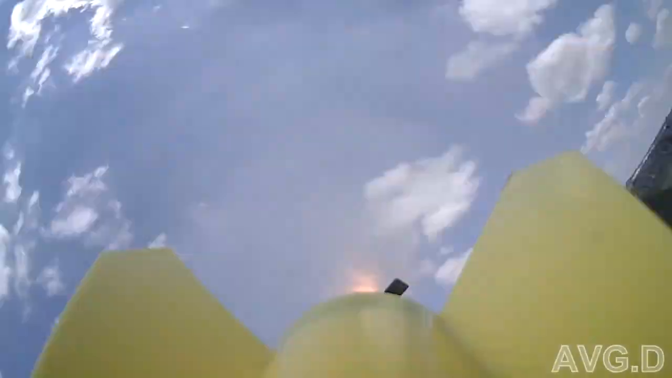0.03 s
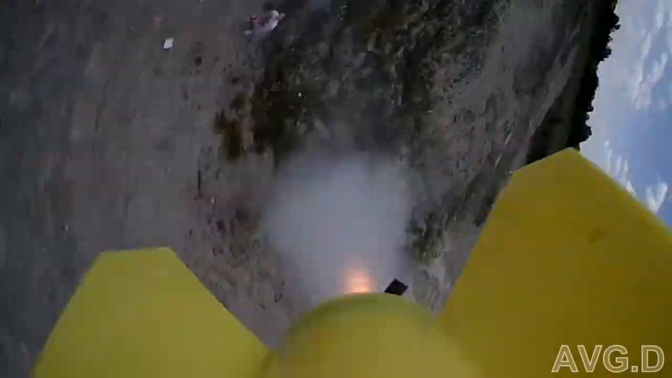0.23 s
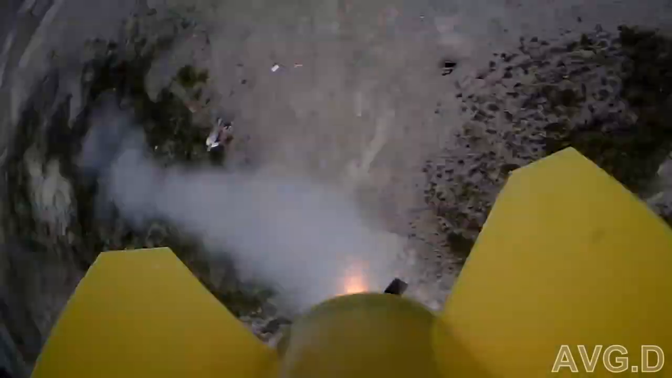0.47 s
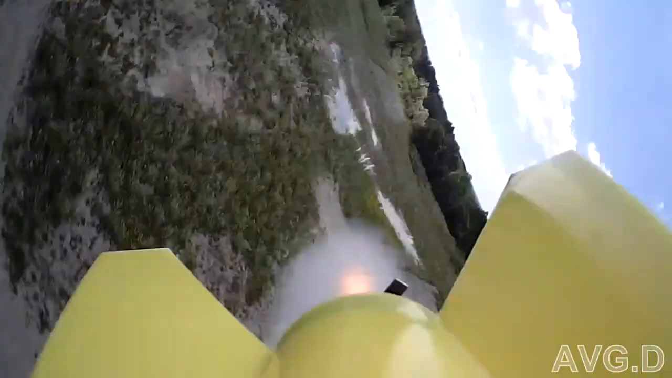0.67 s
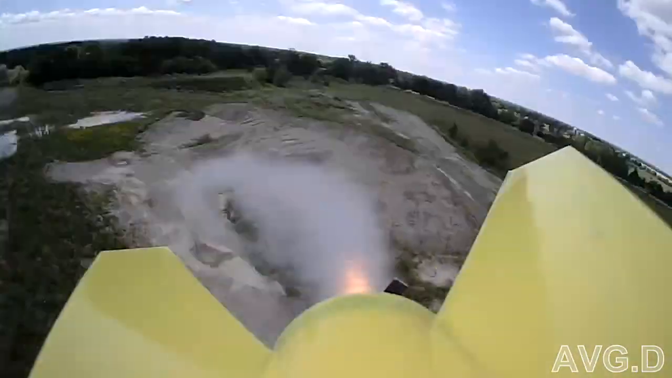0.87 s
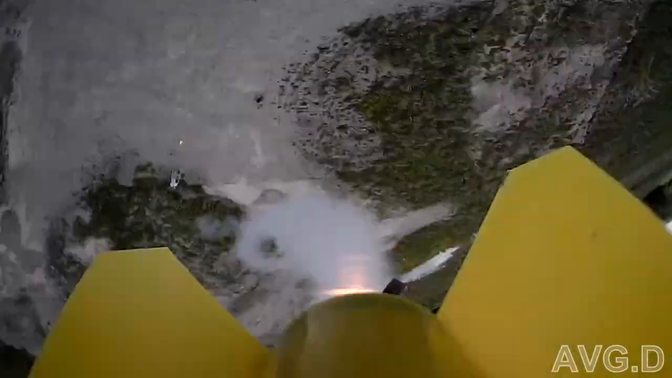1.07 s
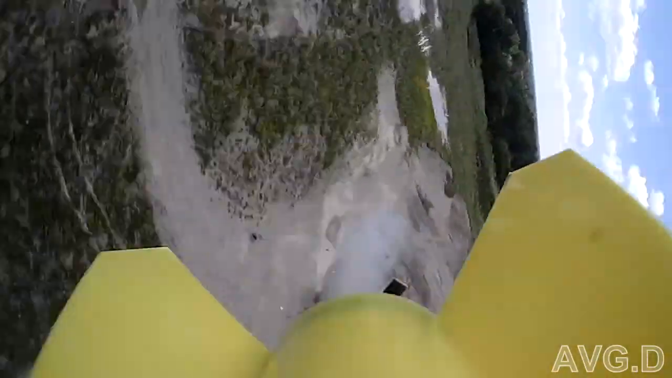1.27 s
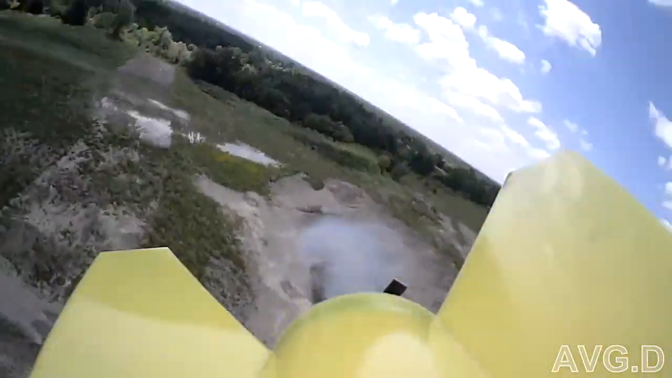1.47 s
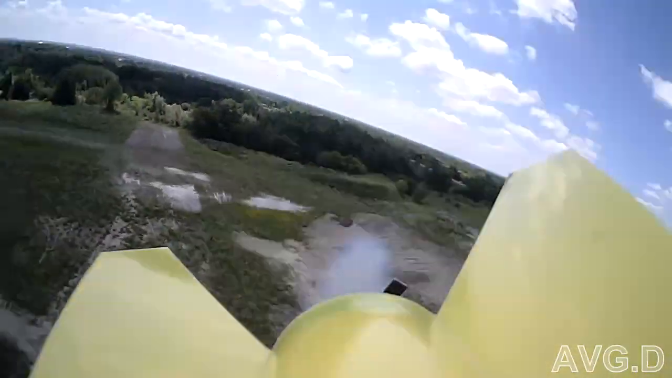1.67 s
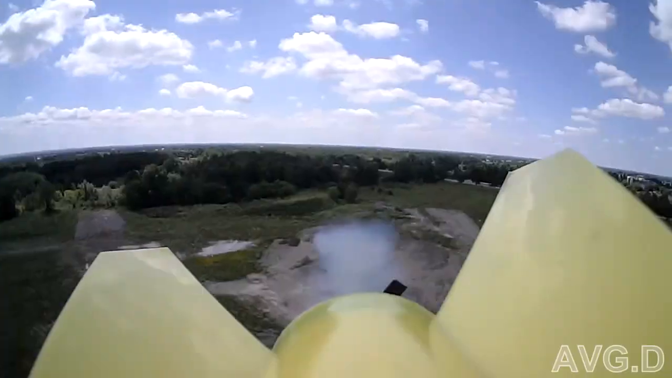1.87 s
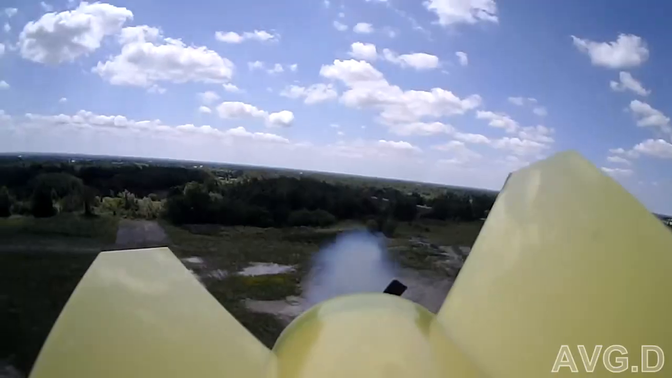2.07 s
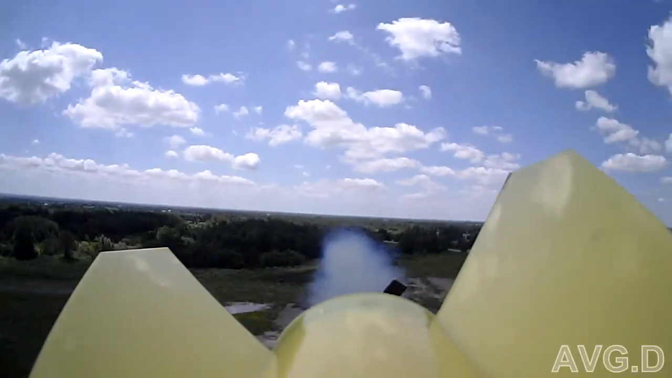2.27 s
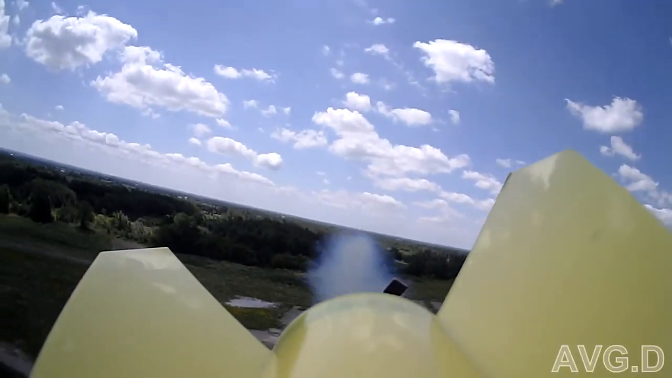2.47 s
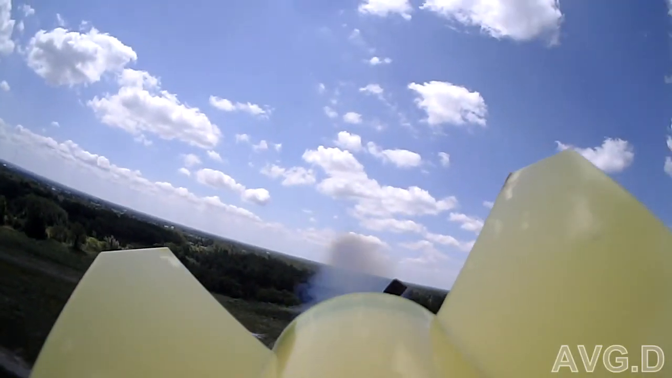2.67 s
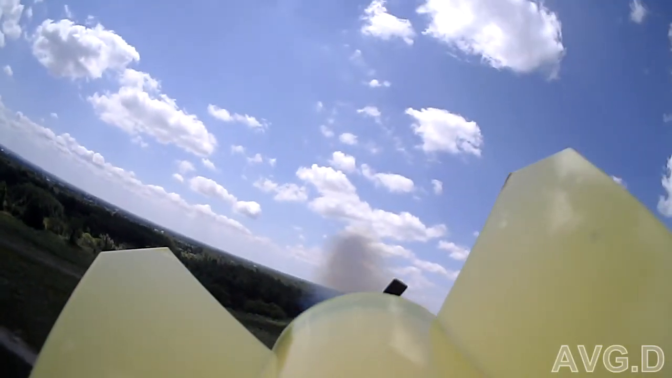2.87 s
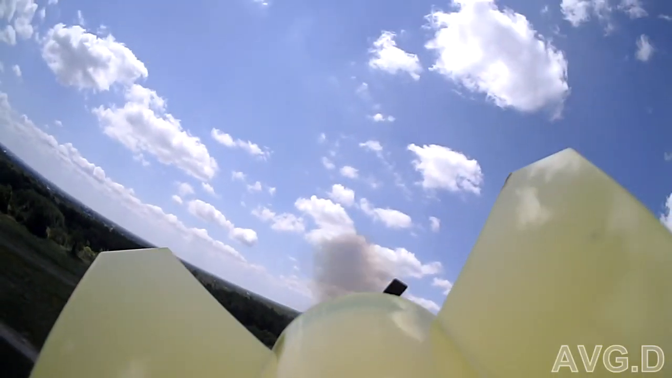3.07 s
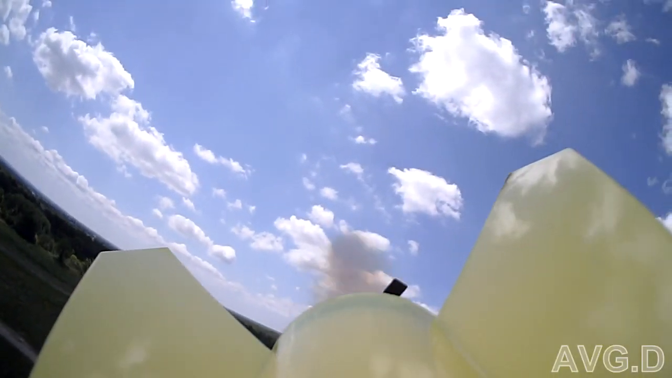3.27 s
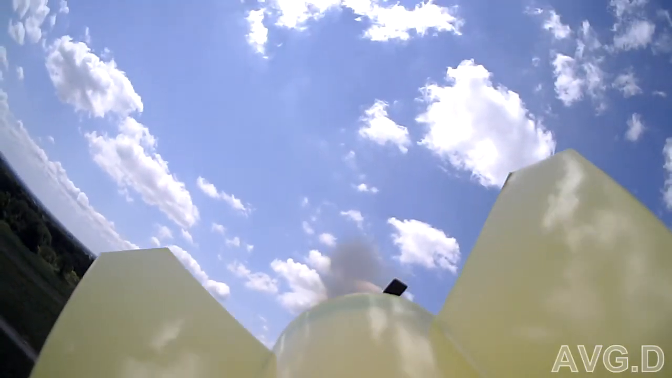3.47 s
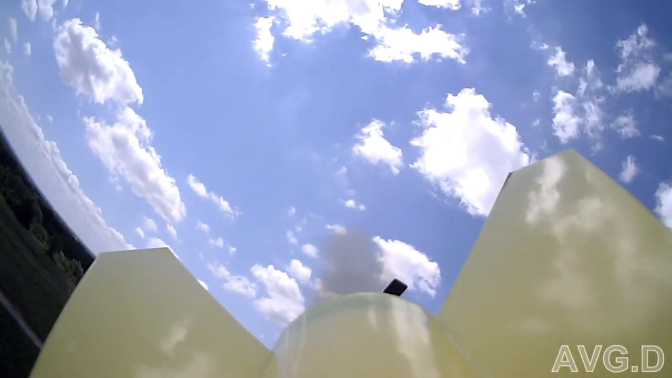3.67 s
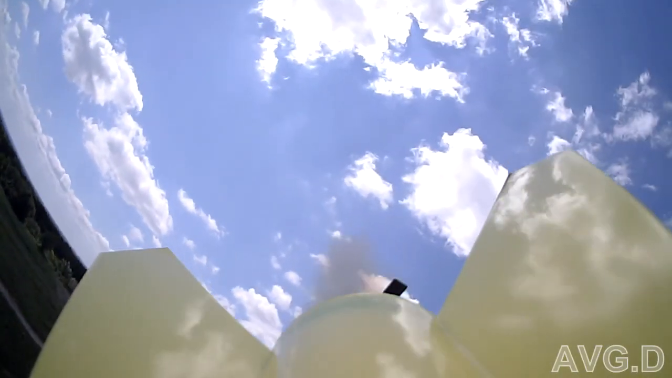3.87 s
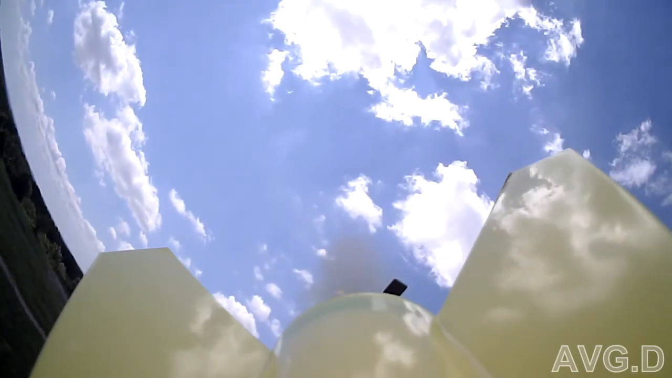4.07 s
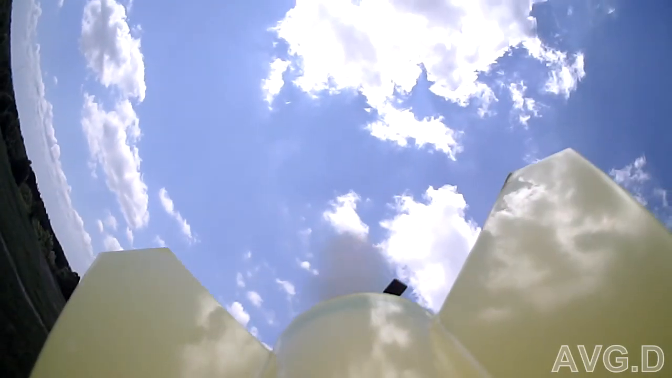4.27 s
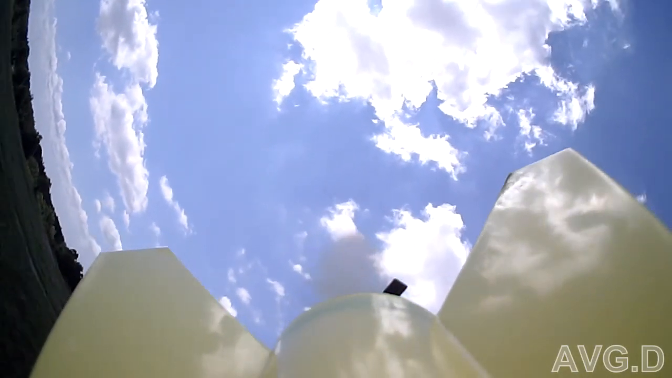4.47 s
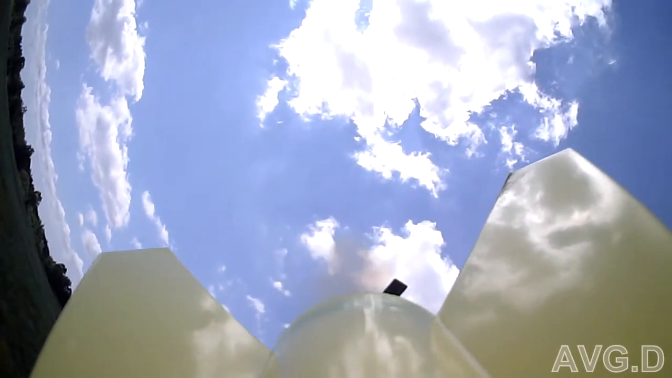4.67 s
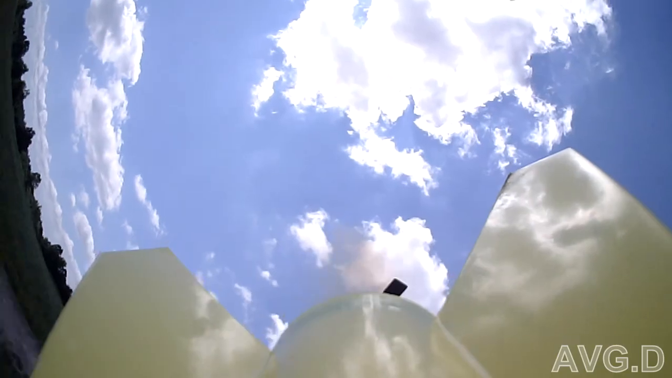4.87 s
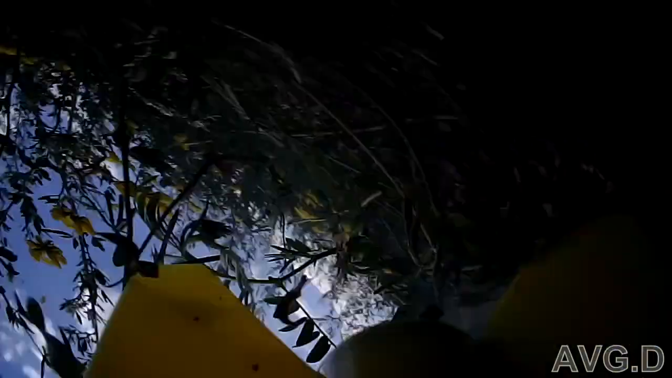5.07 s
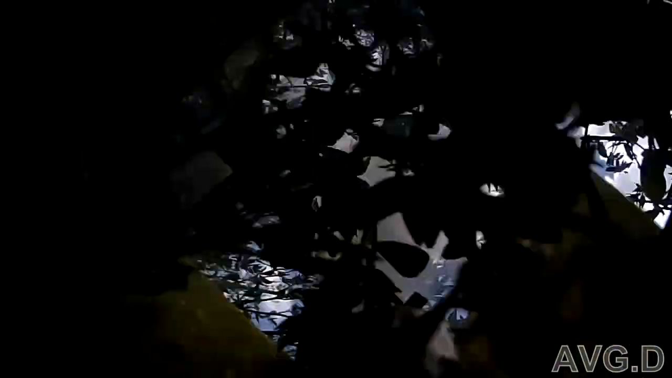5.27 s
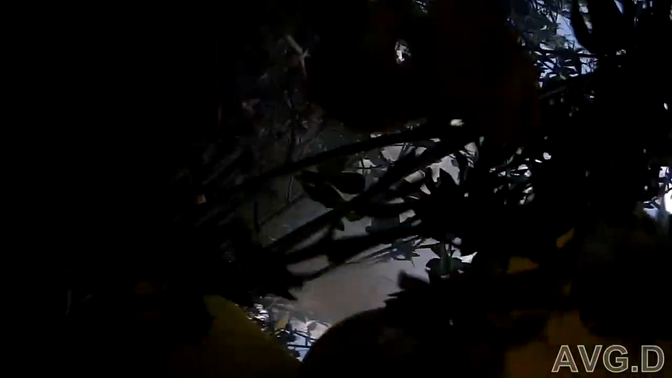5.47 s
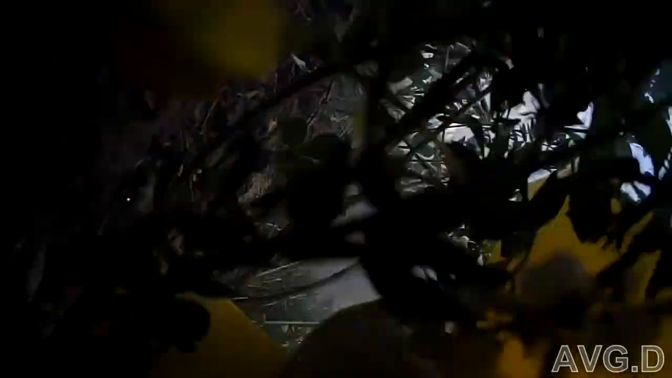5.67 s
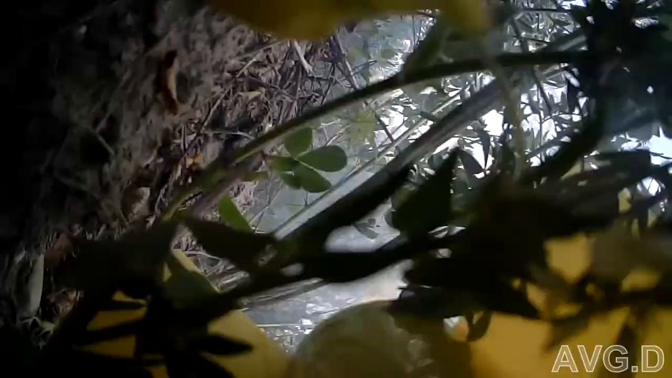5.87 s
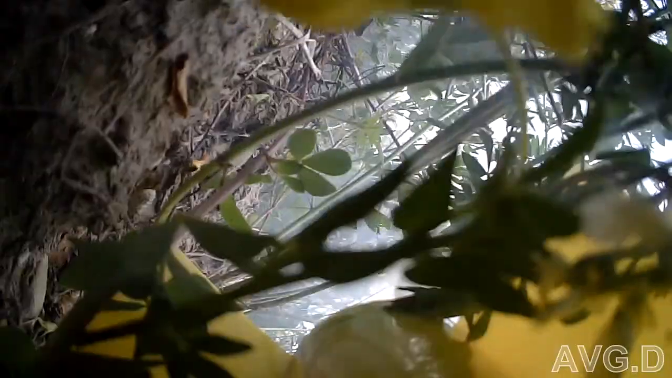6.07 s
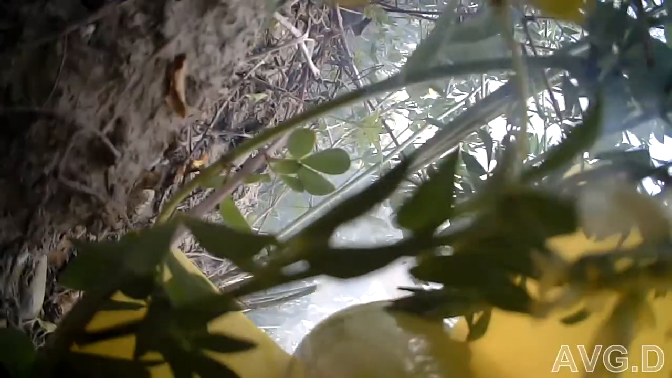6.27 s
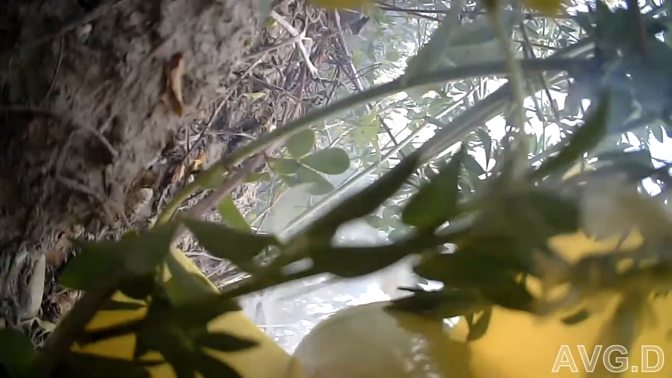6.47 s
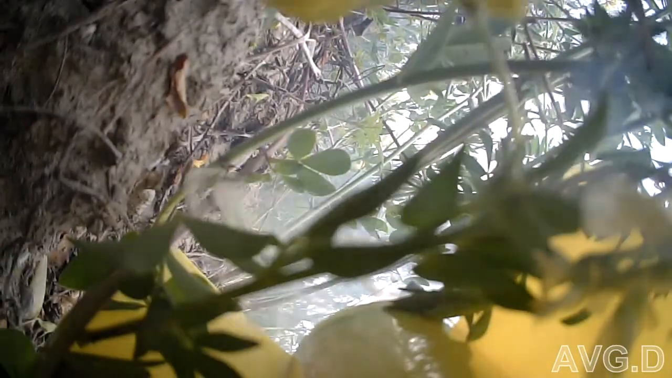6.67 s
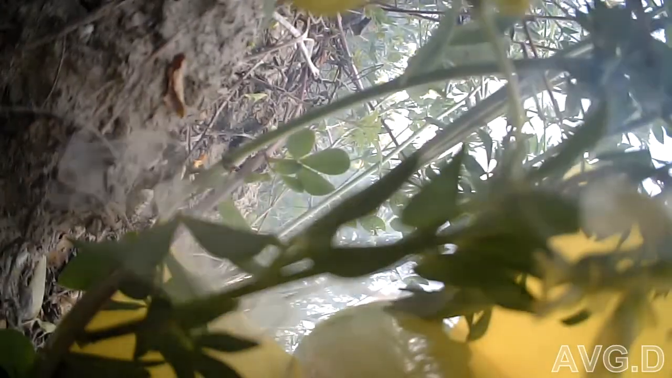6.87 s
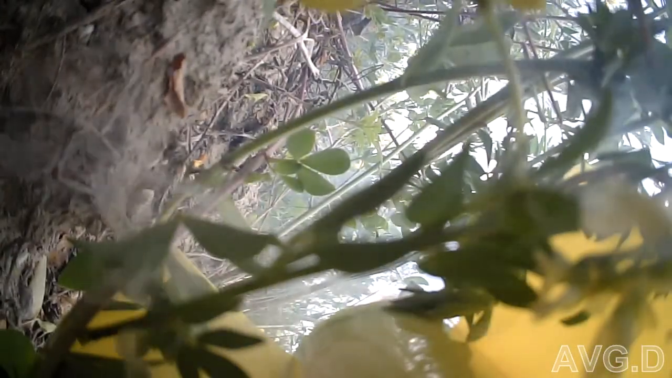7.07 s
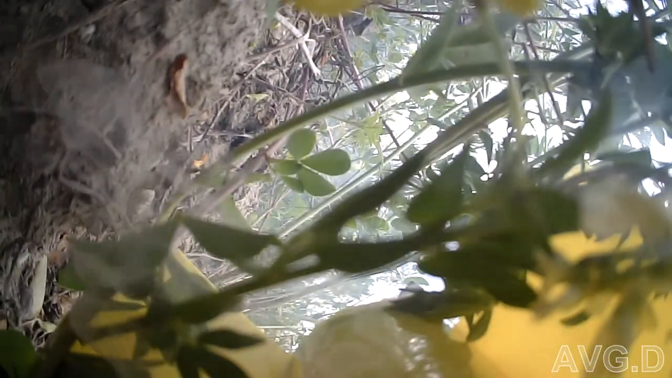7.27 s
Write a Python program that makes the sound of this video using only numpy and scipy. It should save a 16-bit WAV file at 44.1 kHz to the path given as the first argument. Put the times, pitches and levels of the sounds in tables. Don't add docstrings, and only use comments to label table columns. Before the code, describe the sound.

Close, overloaded onboard sound from a tumbling model rocket: a bright jet hiss, roaring air, deep flutter and brief hollow howls. Burnout leaves coarse wind that swells and sinks until a sudden clipped crash into plants. The wind stops dead; stems snap, gas leaks and fizzes, loose parts click, a double bang cracks, and the last gas sighs away into quiet microphone hiss with tiny twig ticks.

```python
import sys
import numpy as np
from scipy import signal
from scipy.fft import rfft, irfft, next_fast_len
from scipy.io import wavfile
from scipy.ndimage import map_coordinates

SR = 44100
rng = np.random.default_rng(int(sys.argv[2]) if len(sys.argv) > 2 else 0)


def nominal_scale(level):
    x = np.asarray(level, float) / 20
    return 10 ** x


def log_audio(samples):
    frames = np.atleast_2d(samples).T
    limited = np.clip(frames, -1, 1)
    pcm = np.round(limited * 32767).astype(np.int16)
    wavfile.write(sys.argv[1], SR, pcm)


N = 323253
CLOCK_S = np.arange(N) / SR

# pitch_hz [Hz], level_db [dB per Hz]
SLIPSTREAM_COLOUR = [(180, -35), (300, -1.5), (439, -2.5), (1110, 2.5), (1700, 0), (2750, -15.5),
                     (3830, -16), (5980, -20), (6820, -29), (7920, -31), (9190, -67), (14400, -59),
                     (15600, -51)]
# pitch_hz [Hz], level_db [dB per Hz]
BUFFET_COLOUR = [(15, -40), (30, -11), (90, -1.5), (200, -1.5), (450, -3.5), (1000, -14.5), (2000, -59)]
LEAK_WIDENS_S = 5.28


def unit(x):
    return x / np.sqrt(np.mean(x ** 2) + 1e-20)


def gains(rows):
    start_s, level_db = np.transpose(rows)
    return np.interp(CLOCK_S, start_s, level_db)


def wobble(rate):
    coarse = np.arange(0, N + 32, 32)
    knots = rng.standard_normal(int(N * rate / SR) + 4)
    return np.interp(np.arange(N), coarse, map_coordinates(knots, [coarse * rate / SR]))


def filtered(x, response):
    size = next_fast_len(len(x) + 8192)
    hz = np.fft.rfftfreq(size, 1 / SR) + 1
    return irfft(rfft(x, size) * response(hz), size)[:len(x)]


def colour(points, lo_hz=1, hi_hz=40000):
    pitch_hz, level_db = np.transpose(points)

    def response(hz):
        edges = np.sqrt((1 + (lo_hz / hz) ** 8) * (1 + (hz / hi_hz) ** 8))
        return nominal_scale(np.interp(np.log(hz), np.log(pitch_hz), level_db)) / edges
    return response


def rush(response, lump_db, eddies, span=(0, N)):
    lumps = nominal_scale(lump_db * wobble(eddies))[slice(*span)]
    noise = filtered(lumps * rng.standard_normal(len(lumps)), response)
    return np.pad(unit(noise), (span[0], N - span[1]))


def gate(start, end):
    return np.clip((CLOCK_S - start) / .004 + 1, 0, 1) * np.clip((end - CLOCK_S) / .004, 0, 1)


def fall(start, db_per_s):
    return -db_per_s * np.clip(CLOCK_S - start, 0, None)


def bumps(rows):
    return sum(nominal_scale(db - 10 * np.abs(CLOCK_S - s) / half_s) ** 2 for s, db, half_s in rows)


def self_noise():
    floor_colour = [(12, -35), (20, -3.5), (27, -14.5), (90, -15), (479, -20.5), (1270, -25), (1460, -24),
                    (2280, -32), (10300, -37.5), (15600, -40)]
    return nominal_scale(-51.5) * rush(colour(floor_colour), .3, 15)


def airflow(buffet, stream, fins, jet):
    # pitch_hz [Hz], level_db [dB per Hz]
    shell_colour = [(2000, -8.5), (2750, -15), (3300, -8), (4200, -5), (5500, -15), (6000, -14.5),
                    (6900, -4.5), (7900, -23.5), (9000, -9.5), (10800, -9.5), (11700, -13), (12800, -11),
                    (14400, -11), (15600, -20)]
    air = buffet * rush(colour(BUFFET_COLOUR), 1.9, 25)
    air += stream * rush(colour(SLIPSTREAM_COLOUR, lo_hz=350), 0.63, 90)
    air += nominal_scale(-4.0) * fins * rush(colour(shell_colour, lo_hz=2370, hi_hz=7200), 0.96, 150)
    gust = nominal_scale(0.37 * wobble(14))
    return gust * air + nominal_scale(1.5) * jet * rush(colour(shell_colour, lo_hz=2640), 0.8, 200)


def motor_roar(burn_db):
    roar_colour = colour(SLIPSTREAM_COLOUR, lo_hz=420, hi_hz=2150)
    return nominal_scale(-16 + burn_db) * rush(roar_colour, .6, 90, (0, 2 * SR))


def lurch():
    level = nominal_scale(-14.5 - 46 * CLOCK_S + fall(.095, 450))
    rumble_colour = colour([(10, -19.0), (30, -4.5), (80, -4.5), (200, -20), (400, -59.5)])
    return level * rush(rumble_colour, .8, 38, (0, SR))


def slaps():
    tears = [(.005, -13.5, .06, 200), (.515, -7.5, .035, 200), (.6, -15, 0.045, 248.3),
             (.71, -8.5, 0.036, 70), (.685, -8, 0.039, 220), (.855, -6.5, 0.036, 300),
             (1.055, -8.5, 0.041, 261), (1.121, -12, 0.028, 400), (1.3, -20, 0.041, 149.4),
             (1.689, -21, 0.057, 110), (2.14, -22, 0.072, 98.6)]
    band_ratio = 2.1
    out, t = np.zeros(N + SR), np.arange(-SR // 4, SR // 4) / SR
    for start_s, level_db, half_s, eddy_hz in tears:
        swell = nominal_scale(-10 * np.abs(t) / half_s)
        band = colour(BUFFET_COLOUR, lo_hz=eddy_hz / band_ratio, hi_hz=eddy_hz * band_ratio)
        eddies = swell * filtered(rng.standard_normal(len(t)), band)
        level = nominal_scale(level_db) * np.linalg.norm(swell) / np.linalg.norm(eddies)
        out[round(start_s * SR):][:len(t)] += level * eddies
    return out[SR // 4:][:N]


def howl(sideways):
    ring = np.sqrt(nominal_scale(-17 + fall(1.5, 28.5)) ** 2 + sideways)
    hole_colour = colour([(800, -42), (1200, -8), (1450, 0), (1700, -5.0), (1900, -7.5), (2400, -43.5)])
    return ring * rush(hole_colour, 1.5, 60)


def flight():
    # start_s [s], level_db slipstream level [dB]
    airspeed = [(0, -23.5), (.4, -18.5), (.48, -12), (.62, -19), (.76, -11), (.86, -7), (.96, -10),
                (1.07, -5), (1.17, -11), (1.215, -8.5), (1.24, -17), (1.45, -12), (2.1, -15), (3.2, -16.5),
                (4.2, -14.5), (4.96, -11)]
    # start_s [s], level_db [dB], half_s half length [s]
    turns = [
        (.945, -5.5, 0.071),
        (1.15, -10, .025),
        (1.205, -10.5, .025),
    ]
    burnout_s, stop_s, reference_db = 1.115, 4.997, -15
    swing_s, swing_period_s, swing_db, swing_damp_s = 1.504, .41, 3, .7

    since = CLOCK_S - swing_s
    swing = swing_db * np.exp(-since / swing_damp_s) * np.cos(2 * np.pi * since / swing_period_s)
    speed_db = gains(airspeed)
    flow_db = speed_db + swing * np.clip(since / swing_period_s * 4 + 2, 0, 1)
    buffet = nominal_scale(-24 + 0.86 * (flow_db - reference_db))
    hiss = nominal_scale(1.2 * (speed_db - reference_db))
    burn_db, sideways = fall(burnout_s, 330.5), bumps(turns)

    fins = np.sqrt((nominal_scale(-28.5) * hiss) ** 2
                   + nominal_scale(-20.5 + burn_db) ** 2
                   + nominal_scale(0.5) ** 2 * sideways
                   + nominal_scale(-19 + fall(burnout_s, 13.5)) ** 2)
    jet = np.sqrt((nominal_scale(-48.5) * hiss) ** 2
                  + nominal_scale(-13 - 1.5 * CLOCK_S + burn_db) ** 2
                  + nominal_scale(-33.5 + fall(burnout_s, 23)) ** 2)
    air = airflow(buffet, nominal_scale(flow_db), fins, jet)
    return gate(0, stop_s) * (air + motor_roar(burn_db) + slaps() + lurch() + howl(sideways))


def blows(count=5):
    knocks = [
        (4.967, 7.5, .006, 0.0071, 10),
        (4.973, -8.5, 0.0055, 0.03, -7.5),
        (4.9976, 9, 0.013, 0.015, 8),
        (5.086, -26.5, .007, .015, -40),
        (5.315, -50, 0.011, .02, -29.5),
        (5.554, -21, 0.0039, .04, -40),
        (5.595, -11.5, .004, .02, -30.5),
        (5.6003, 0, 0.0051, 0.02, -9.5),
        (5.607, 1, 0.0019, 0.021, -15),
        (5.609, -15.5, 0.015, .06, -20),
    ]
    # pitch_hz [Hz], level_db [dB per Hz]
    crash_colour = [(59, -29.5), (100, -1), (554, -7.5), (1660, 0.5), (2760, -7), (4120, -10),
                    (6150, -16.5), (6700, -11), (7440, -24.5), (11100, -23), (15600, -29)]
    first_s, gap_s, first_db, last_db, close_in = 5.015, .01, 0, -15.5, 0.33
    stems = []
    for k in range(count):
        body_db = last_db + (first_db - last_db) * close_in ** k
        stems.append((first_s + gap_s * k, body_db, .005, .017, 3.5 - 9 * k))

    t = np.arange(SR // 8) / SR
    crash, shove = np.zeros((2, N))
    for start_s, body_db, hold_s, t60_s, thud_db in knocks + stems:
        start = round(start_s * SR)
        at = slice(start, start + len(t))
        crash[at] += nominal_scale(body_db - 60 * np.clip(t - hold_s, 0, 1) / t60_s) * (1 - np.exp(-t / .0005))
        u = t / (0.51 * hold_s)
        shove[at] += nominal_scale(thud_db) * np.sin(1.9 * u) * u * np.exp(-u)
    shove = filtered(shove, lambda hz: 1j * hz / (45 + 1j * hz))

    snap = nominal_scale(-7) * rush(colour(crash_colour, lo_hz=3000), 1.6, 440)
    body = rush(colour(crash_colour, hi_hz=3040), 1.8, 300)
    thin = filtered(body, lambda hz: 1 / np.sqrt(1 + (420 / hz) ** 2))
    return crash * (np.where(np.arange(N) < LEAK_WIDENS_S * SR, body, thin) + snap) + shove


def vent(levels_db, spectrum):
    drone, hiss, fizz = [nominal_scale(db) for db in levels_db]
    sputter, span = nominal_scale(1.3 * wobble(45)), (5 * SR, 6 * SR)
    gas = drone * rush(colour(spectrum, hi_hz=2600), 1.8, 70, span)
    gas += hiss * rush(colour(spectrum, lo_hz=2585, hi_hz=7800), 1.1, 120, span)
    gas += fizz * rush(colour(spectrum, lo_hz=8070), 1.2, 150, span)
    return sputter * gas


def charge():
    # start_s [s], level_db hiss level [dB]
    pressure = [
        (5.066, -36),
        (5.125, -40),
        (5.15, -32.5),
        (5.198, -31.5),
        (5.206, -37.5),
        (5.24, -31.5),
        (5.53, -30),
        (5.575, -25),
        (5.598, -20.5),
    ]
    # pitch_hz [Hz], level_db [dB per Hz]
    leak_colour = [(59, -49), (100, -19.5), (615, -12), (1660, -3), (1970, -10.5), (2190, 0), (2530, -26),
                   (3330, -6), (6030, -17.5), (6990, -9.5), (7760, -25), (10900, -17), (15600, -27.5)]
    vent_colour = [(60, -17.5), (500, -9.5), (1520, 0), (2010, -7), (2310, -2.5), (2720, -16.5), (3950, -5),
                   (5730, -17), (6910, -8), (7760, -24.5), (9800, -21.5), (10700, -14), (11700, -21.5),
                   (15600, -24.5)]
    smoke_colour = [(59, -37.5), (100, -11), (363, -10), (488, -6.5), (1000, -3.5), (1370, -1),
                    (3200, -16.5), (5090, -4), (8630, -24.5), (14300, -26), (15600, -29.5)]
    leak_mix = [
        (1, 1),
        (0.5, 1),
        (-6, 1),
    ]
    vent_mix = [
        (5, .9),
        (-0.5, 0.92),
        (-5.5, 1.8),
    ]
    puff_mix = [
        (-18.5, 170, 320),
        (-28.5, 5.5, 460),
        (-32, 150, 800),
    ]
    reference_db, puff_s, shut_s = -32, 5.628, 5.685
    over = gains(pressure) - reference_db
    leak = [reference_db + db + grows * over for db, grows in leak_mix]
    wide = [reference_db + db + grows * over for db, grows in vent_mix]
    puff = [db + fall(puff_s, sag) + fall(shut_s, shut) for db, sag, shut in puff_mix]
    start_s, bang_s = pressure[0][0], pressure[-1][0]
    gas = gate(start_s, LEAK_WIDENS_S) * vent(leak, leak_colour)
    gas += gate(LEAK_WIDENS_S, bang_s + .002) * vent(wide, vent_colour)
    return gas + gate(puff_s, 7) * vent(puff, smoke_colour)


def crackle(count=70):
    out, t = np.zeros(N), np.arange(256) / SR
    when, pitch, size = rng.random((count, 3)).T
    for start_s, hz, db in zip(5.07 + 0.65 * when, 1300 * 3.4 ** pitch, -32 - 3.1 * np.log(size)):
        out[round(start_s * SR):][:len(t)] += nominal_scale(db - 60 * t / .006) * np.sin(2 * np.pi * hz * t)
    return out


def ticks():
    contacts = [(5.1123, 2140, -24, 9), (5.1123, 6200, -28, -7.5), (5.1387, 1280, -17, -11),
                (5.193, 350, -22, 6), (5.1953, 1620, -13.5, -6), (5.2687, 2360, -6, -4),
                (5.2687, 5600, -8, -21.5), (5.3054, 1320, -17, -1), (5.3556, 1670, -14, 4.5),
                (5.3926, 2200, -21, -15), (5.7545, 3800, -34, -5), (5.7665, 7000, -40, -4.5),
                (5.7728, 1580, -22, -14), (5.7945, 1350, -25, -2), (5.8054, 1700, -24, -2),
                (5.841, 1850, -24, -15), (5.8754, 1640, -38, 4), (5.8985, 3800, -30, -4),
                (5.8985, 8800, -33, -6), (5.9155, 2680, -23, -13), (5.9155, 1520, -26, -10),
                (5.9464, 4200, -37, 2), (5.9464, 9000, -43, -2), (6.0994, 3500, -37, -5),
                (5.9055, 6000, -45, 2), (5.965, 1700, -38, -2), (6.6169, 1640, -40, -15),
                (6.7186, 3400, -35, -1), (6.0994, 9000, -48, 2), (7.1044, 1294, -45, -12.5)]
    out, t = np.zeros(N + SR), np.arange(SR // 40) / SR
    for start_s, low_hz, low_db, over_db in contacts:
        high_hz = 1.2 * low_hz + 1700
        for hz, db in ((low_hz, low_db), (high_hz, low_db + over_db)):
            band = colour([(1, 1), (20000, 0)], lo_hz=0.91 * hz, hi_hz=0.89 * hz)
            crack = unit(filtered(rng.standard_normal(len(t)), band))
            t60_s = 12 / hz + 0.0022
            envelope = nominal_scale(db + 2.5 - 60 * t / t60_s) * (1 - np.exp(-t / 0.00034))
            out[round(start_s * SR):][:len(t)] += envelope * (np.sin(2 * np.pi * hz * t) + 0.26 * crack)
    return out[:N]


def drain():
    # pitch_hz [Hz], level_db [dB per Hz]
    sigh_colour = [(60, -11.5), (150, -11), (550, -3), (1200, -12.5), (1750, -4), (2250, -10.5),
                   (2500, -17), (3100, -18), (3700, -12), (4400, -24.5), (5600, -24), (7000, -22),
                   (8000, -38), (15000, -45.5)]
    drain_mix = [
        (-42, .3, 23, -58),
        (-43.5, 0.16, 19, -75),
        (-47, .07, 32, -67.5),
    ]
    drain_s, rise_s = 5.71, .06
    rise = np.clip((CLOCK_S - drain_s) / rise_s + .5, 0, 1)
    sigh, ring, thin = [rise * np.hypot(nominal_scale(db + fall(drain_s + hold_s, rate)), nominal_scale(rest_db))
                        for db, hold_s, rate, rest_db in drain_mix]
    gas = sigh * rush(colour(sigh_colour, hi_hz=1188), 1.8, 36)
    gas += ring * rush(colour(sigh_colour, lo_hz=1200, hi_hz=2500), 1.5, 37)
    return gas + thin * rush(colour(sigh_colour, lo_hz=2500), 1.5, 60)


def scene():
    capsule = self_noise() + flight() + blows() + charge() + crackle() + ticks() + drain()
    return np.tile(capsule, (2, 1))


def low_pass(x):
    return signal.sosfilt(signal.butter(12, 15740, fs=SR, output="sos"), x)


def record(dry):
    x = dry[0] + .0039
    x = x / (1 + np.abs(x) ** 10) ** (1 / 10)
    x = filtered(x, lambda hz: (hz < 15740) / np.sqrt(1 + (hz / 15000) ** 16))
    mix = np.tile(np.clip(x, -1, 1), (2, 1))
    return low_pass(mix)


dry = scene()
out = record(dry)
log_audio(out)
```